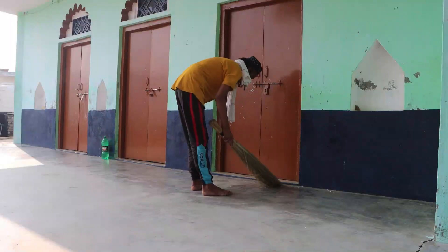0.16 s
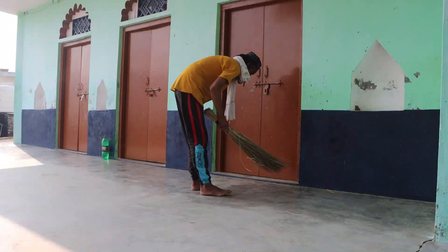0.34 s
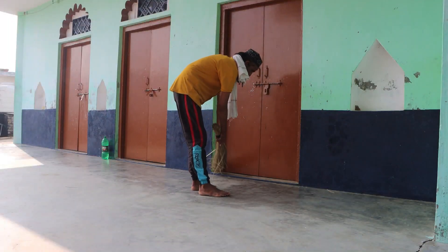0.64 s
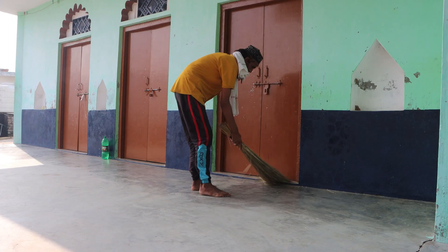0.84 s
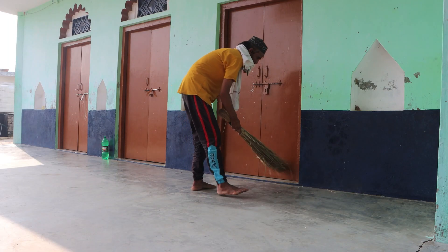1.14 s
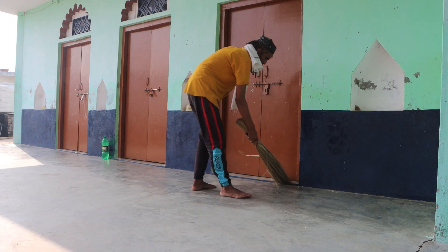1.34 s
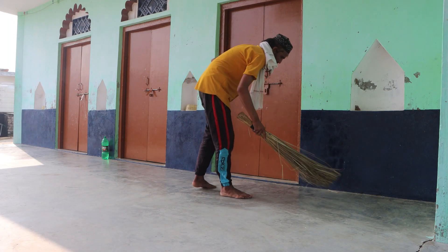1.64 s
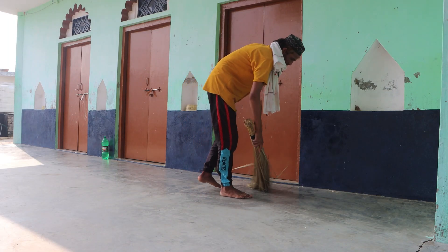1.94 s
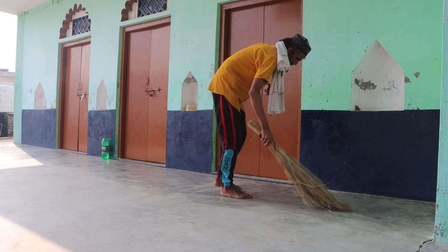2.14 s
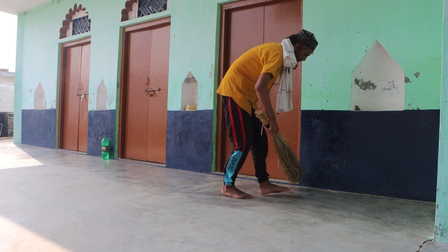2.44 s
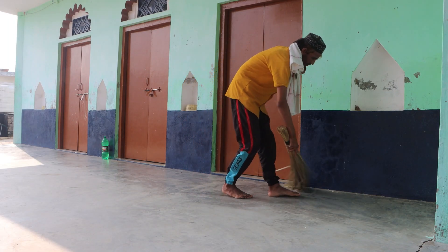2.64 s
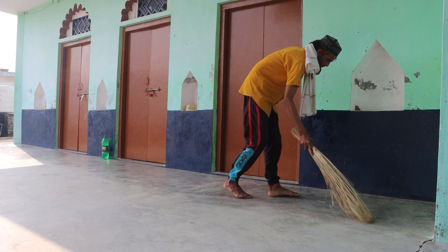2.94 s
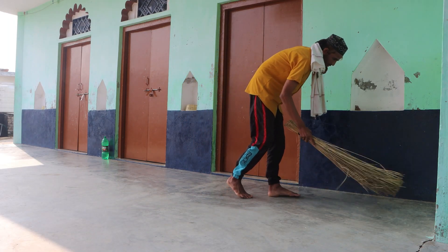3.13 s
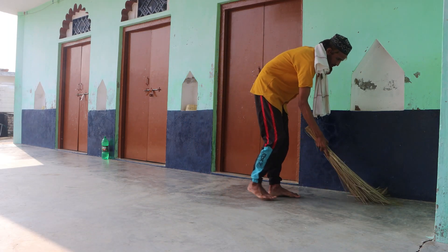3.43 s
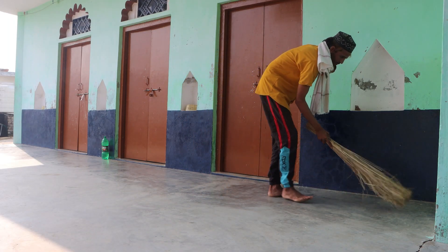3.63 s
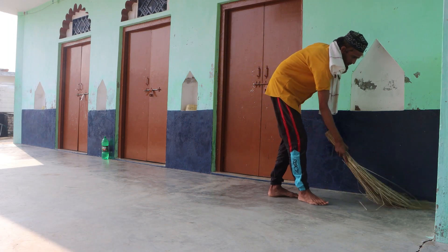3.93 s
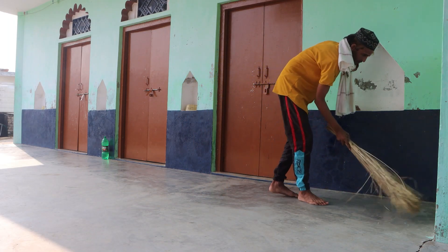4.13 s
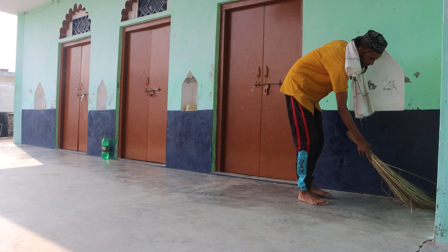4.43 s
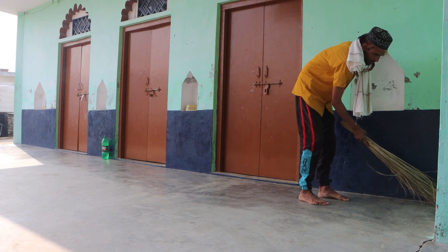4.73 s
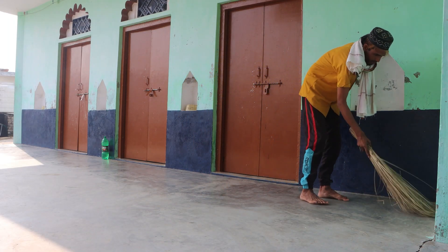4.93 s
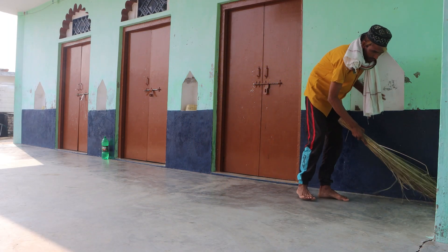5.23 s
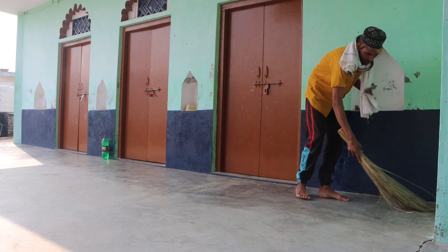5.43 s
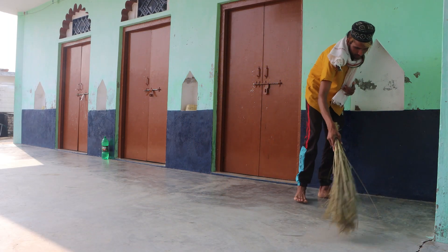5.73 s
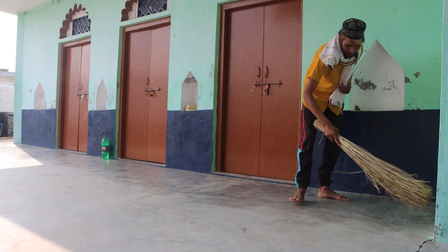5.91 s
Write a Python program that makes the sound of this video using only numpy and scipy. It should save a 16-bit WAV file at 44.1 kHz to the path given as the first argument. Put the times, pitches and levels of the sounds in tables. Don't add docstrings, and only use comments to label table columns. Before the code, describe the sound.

Low traffic rumble, a faint engine idle and airy hiss open the scene and stay behind everything. Almost at once a stiff straw broom begins swishing over concrete, about ten crisp strokes in six seconds, the first one followed by a longer, lighter gap. The strokes get louder and closer together midway, with sharp straw clicks and short rattles. Mono, a few metres off, with a short wall reflection.

```python
import sys
import numpy as np
from scipy import signal
from scipy.fft import rfft, irfft
from scipy.io import wavfile
from scipy.ndimage import uniform_filter1d, map_coordinates

SR = 44100
rng = np.random.default_rng(int(sys.argv[2]) if len(sys.argv) > 2 else 0)


def to_linear_factor(level_db):
    exponent = np.asarray(level_db, float) / 20
    return 10 ** exponent


def to_wav(sig):
    pcm = np.clip(np.atleast_2d(sig), -1, 1) * 32767
    pcm = np.round(pcm).astype(np.int16)
    wavfile.write(sys.argv[1], SR, pcm.T)


N = 267673
TIME_S = np.arange(N) / SR
SLOW_S = np.arange(0, N / SR, .001)


def unit(x):
    return x / np.sqrt(np.mean(x ** 2) + 1e-20)


def curves(rows):
    s, *columns = np.transpose(rows)
    return [np.interp(TIME_S, s, column) for column in columns]


def fine(slow):
    return np.interp(TIME_S, SLOW_S, slow)


def bell(s, half):
    return np.exp(-((SLOW_S - s) / half) ** 2)


def swell(s, half, db):
    return to_linear_factor(db) ** 2 * bell(s, half)


def wobble(rate):
    knots = rng.standard_normal(int(N * rate / SR) + 4)
    return map_coordinates(knots, [np.arange(N) * rate / SR])


def coloured(x, points):
    m = 2 ** 14
    f, db = np.transpose(points)
    hz = np.fft.rfftfreq(m, 1 / SR)
    shape_db = np.interp(np.log(hz + 1), np.log(f + 1), db, left=-70, right=-70)
    cepstrum = irfft(np.log(to_linear_factor(shape_db)), m)
    cepstrum[1:m // 2] *= 2
    cepstrum[m // 2 + 1:] = 0
    h = irfft(np.exp(rfft(cepstrum)), m)[:m // 2]
    return signal.oaconvolve(x, h / np.linalg.norm(h))[:N]


def slips(spread_db, clump_db):
    size_db = spread_db * np.minimum(rng.exponential(size=N), 4.5) + clump_db * wobble(500)
    return unit(rng.standard_normal(N) * to_linear_factor(size_db))


def burst(s, length, source):
    out, start, t = np.zeros(N), round(s * SR), np.arange(SR // 8) / SR
    out[start:start + len(t)] = np.exp(-(t / length) ** 3) * source[start:start + len(t)]
    return out


def levelled(piece, length, db):
    return to_linear_factor(db) * np.sqrt(length * SR) / np.linalg.norm(piece) * piece


# time in seconds, level in dB.
TRAFFIC_LEVEL = [(0, -32), (.39, -43), (.59, -31.5), (.9, -36), (1.2, -38), (1.4, -31), (1.57, -44.5),
                 (2.2, -38.5), (2.5, -35.5), (2.75, -34), (2.94, -43), (3.48, -31.5), (3.63, -47),
                 (4.36, -36), (5.21, -39), (5.34, -29.5), (5.66, -38), (6.07, -27.5)]
# peak in seconds, half length in seconds, boom in dB, drone in dB.
PASSES = [
    (.6, 0.18, -49.5, -58),
    (1.386, 0.091, -47, -41.5),
    (1.6, 0.082, -46, -52),
    (1.9, 0.21, -46, -42),
    (2.844, 0.17, -52, -52),
    (5.698, 0.25, -40.5, -52),
    (6.031, 0.12, -54, -46.5),
]
# frequency in Hz, density in dB per Hz.
RUMBLE_COLOUR = [(12, -39), (25, -5), (38, 0), (50, 1.5), (66, -6), (85, -17.5), (120, -30)]
BOOM_COLOUR = [(55, -38), (75, 0.5), (95, -8), (125, -3.5), (160, -14.5), (220, -24)]
DRONE_COLOUR = [(110, -40), (150, -8), (200, 3), (300, 1.5), (420, -1.5), (700, -4)]
AIR_COLOUR = [(150, 5.5), (250, -18.5), (583, -4), (931, -6), (1620, -5.5), (3900, -5.5), (5920, -8.5),
              (8520, -3), (13100, -6.5), (15600, -18)]


def street():
    rumble_db, = curves(TRAFFIC_LEVEL)
    swing_db = rumble_db - rumble_db.mean()

    def noise(colour):
        return coloured(rng.standard_normal(N), colour)

    def with_passes(db, column):
        passing = sum(swell(row[0], row[1], row[column]) for row in PASSES)
        return np.sqrt(to_linear_factor(db) ** 2 + fine(passing))

    hiss = to_linear_factor(-36 + wobble(36)) * noise(AIR_COLOUR)
    rumble = noise(RUMBLE_COLOUR)
    even, even_s = 0.99, 0.047
    loudness = uniform_filter1d(np.abs(rumble), int(even_s * SR)) + .1
    rumble = unit(rumble / loudness ** even)
    boom_db = -51 + 0.2 * swing_db + 0.95 * wobble(2.82)
    drone_db = -46.5 + 0.55 * swing_db - 1.6 * TIME_S + 0.66 * wobble(4.0)
    boom = with_passes(boom_db, column=2) * noise(BOOM_COLOUR)
    drone = with_passes(drone_db, column=3) * noise(DRONE_COLOUR)
    return to_linear_factor(rumble_db - 4.0) * rumble + boom + drone + hiss


# time in seconds, firing rate in Hz.
ENGINE_SPEED = [(0, 49.3), (.15, 50.9), (.25, 45.3), (.46, 45.7), (1.81, 48.04), (1.99, 45), (2.35, 47.9),
                (2.6, 43.85), (3.01, 47.9), (3.1, 44.3), (4.38, 44.46), (4.97, 44.3), (5.35, 47),
                (5.7, 47.8), (6.07, 47.55)]
ORDER_DB = [-41, -56.5, -56.5, -63]
# peak in seconds, half length in seconds, level in dB.
SURGES = [
    [(0, 0.044, -32), (1.6, 0.14, -38), (2.62, 0.058, -40.5), (4.9, 0.37, -37), (5.95, 0.14, -32)],
    [(.3, 0.24, -47.5), (1.99, 0.089, -43), (5.75, 0.11, -43)],
    [(.13, .04, -36), (4.97, 0.074, -46), (5.65, 0.31, -46.5), (6.07, 0.086, -43)],
    [(1.8, .3, -61), (2.6, 0.13, -50), (3.3, 0.24, -47.5), (4.0, 0.11, -43.5), (5.7, 0.26, -53)],
]


def engine():
    firing_hz, = curves(ENGINE_SPEED)
    turn = 2 * np.pi * np.cumsum(firing_hz) / SR
    out = np.zeros(N)
    for k, (idle_db, surges) in enumerate(zip(ORDER_DB, SURGES)):
        size = fine(np.sqrt(to_linear_factor(idle_db) ** 2 + sum(swell(*row) for row in surges)))
        level_db = -4.0 + 1.7 * wobble(4.5) + 1.3 * k * wobble(11)
        shake = 0.64 * wobble(1.85) + 0.27 * k * wobble(22)
        out += np.sqrt(2) * size * to_linear_factor(level_db) * np.sin(2 ** k * turn + shake)
    return out


def stroke(s, landing, length, land_db, lift_db):
    t = SLOW_S - s - landing
    along = np.clip(t / length, 0, 1)
    db = land_db + (lift_db - land_db) * along
    db += 9 * np.minimum(t, 0) / landing
    db -= 123 * np.maximum(t - length, 0)
    db += 500 * np.minimum(t + landing, 0)
    return to_linear_factor(db) ** 2, along - .5


def touch(power, thick_db, finest_db, stalk_db, ring_hz, weight):
    parts = np.broadcast_arrays(1, to_linear_factor(2 * thick_db), to_linear_factor(2 * finest_db), to_linear_factor(2 * stalk_db), ring_hz, weight)
    return power * np.array(parts).reshape(6, -1)


# touch-down in seconds, landing in seconds, sweep in seconds,
# level after landing in dB, level at lift-off in dB.
STROKES = [(.03, 0.04, 0.2, -20, -22.5), (.83, 0.073, 0.18, -21.5, -19.5), (1.42, 0.13, 0.1, -17, -20.5),
           (2.04, 0.085, 0.21, -17, -30), (2.715, 0.057, 0.42, -17.5, -24.5),
           (3.384, 0.02, 0.21, -13.5, -17), (3.928, 0.035, 0.091, -16.5, -18.5),
           (4.467, 0.014, 0.25, -16.5, -20), (4.915, 0.022, 0.21, -15, -20.5),
           (5.41, 0.032, 0.37, -21.5, -25), ]
# thick straws, finest tips and stalks in dB over the tips,
# tip ring in Hz, stalk weight from 0 to 1.
GRIPS = [(-2.5, -6, -10, 8360, 0.51), (-2.5, -8.5, -8.5, 7450, 0.55), (-8, -10, -9.5, 8440, 0.54),
         (-10, -11.5, -10, 9340, 0.34), (-11, -7.5, -9.5, 9000, 0.39), (-12.5, -10, -13.5, 7970, 0.56),
         (-10.5, -12, -8.5, 8800, 0.53), (-14, -9, -11.5, 8740, 0.5), (-12.5, -12.5, -11, 8260, 0.4),
         (-7.5, -6, -11, 8000, 0.52)]
ROLLS = [-5, 0.52, 5, 0.49, 1, -3, 1.7, -0.6, 0.95, -1]
# peak in seconds, half length in seconds, level in dB,
# stalks in dB over the tips, splay in dB by which thick and finest straws join.
DRAGS = [(0, 0.012, -29, -7, 4.5), (0.39, 0.12, -25, -7.5, -6.5), (0.547, 0.041, -37, -4, 3),
         (0.66, 0.053, -28.5, -7.5, 1.5), (0.802, 0.01, -36, 0.5, 11), (1.24, 0.083, -31.5, -5, -1),
         (1.357, 0.053, -27.5, -1.5, 7.5), (1.841, 0.2, -29.5, -6, -2.5), (1.987, 0.046, -24, -11.5, 0),
         (2.517, 0.073, -28.5, -4, 6), (2.62, 0.057, -24.5, -6.5, 2.5), (3.232, 0.049, -31, -9, 0),
         (3.337, 0.054, -26, -8, 0.5), (3.817, 0.071, -26.5, -10.5, 2), (4.162, 0.027, -22, -19, -5),
         (4.213, 0.041, -24.5, -7, 4.5), (4.308, 0.043, -36, -2.5, 9), (4.431, 0.049, -27, -11, 3),
         (4.888, 0.045, -26, -12.5, 1), (5.328, 0.043, -25, -12.5, -5), (5.373, 0.026, -26, -10, -3),
         (5.825, 0.02, -28.5, -11, -1), (5.91, 0.06, -32, -7.5, -2.5), (5.955, .012, -34, -12, 2),
         (6.014, 0.062, -32, -9, -4), (0.753, 0.028, -37, -13, 3), (2.46, .03, -37.5, -3.5, 10),
         (4.376, 0.019, -37, -4, 7), (3.715, 0.025, -29, -7, 4), (4.79, .015, -38, -4, 5)]
# peak in seconds, half length in seconds, level in dB,
# stalks in dB over the tips, finest tips in dB over the grip.
PUSHES = [(0.122, 0.049, -18, -12.5, 9.5), (.19, 0.035, -24, -21, 8), (0.267, 0.055, -20.5, -13, -4),
          (0.934, 0.056, -19, -16, 12), (1.055, 0.018, -31.5, 2.5, -10), (1.56, 0.035, -17, -16, -12.5),
          (1.671, 0.06, -30, -2, 15.5), (2.12, 0.039, -18.5, -21, -4), (2.2, 0.077, -22.5, -29, 16),
          (2.327, 0.057, -21, -4, 10.5), (2.866, 0.052, -14, -30, -13), (2.964, 0.047, -18, -15, 6),
          (3.099, 0.04, -24, -6, 5), (3.455, 0.048, -18, -9.5, -1), (3.617, 0.062, -20, -11, -4),
          (3.673, 0.029, -19.5, -20, 4), (3.757, 0.051, -22.5, -9, 1), (4.071, 0.039, -12.5, -19.5, 7),
          (4.498, 0.031, -25, -9, -6), (4.54, 0.022, -21.5, -6, -3), (4.578, 0.051, -19, -13.5, 10.5),
          (4.719, 0.033, -23.5, -8.5, 9), (5.054, 0.048, -16, -29, 11.5), (5.177, 0.045, -24.5, -4.5, 14),
          (5.451, 0.03, -26, -3.5, -9), (5.646, 0.062, -20, -35, 5.5), (5.6, .03, -27, -6, -8),
          (5.76, 0.032, -23.5, -7, 8), (2.816, 0.017, -22, -20, 0)]


def contact():
    total = np.full((6, len(SLOW_S)), 1e-12)
    for row, roll, (thick_db, finest_db, stalk_db, ring_hz, weight) in zip(STROKES, ROLLS, GRIPS):
        power, along = stroke(*row)
        total += touch(power, thick_db - 4.5 * along, finest_db - roll * along, stalk_db + 0.5 * along,
                       ring_hz + 397 * (1 + roll) / 2 * along, weight - 0.28 * along)
    landed_s = [row[0] + row[1] for row in STROKES]
    for s, half, db, stalk_db, splay_db in DRAGS:
        thick_db, finest_db, _, ring_hz, _ = [np.interp(s, landed_s, c) for c in np.transpose(GRIPS)]
        total += touch(swell(s, half, db), thick_db + 0.4 + splay_db, finest_db - 1 + splay_db,
                       stalk_db, ring_hz, weight=0.44)
    starts_s = [row[0] for row in STROKES]
    for s, half, db, stalk_db, fine_db in PUSHES:
        thick_db, finest_db, held_db, ring_hz, weight = GRIPS[np.searchsorted(starts_s, s) - 1]
        thick_db = thick_db + 2 + 0.62 * (stalk_db - held_db)
        ring_hz = ring_hz + 150 + 46 * fine_db
        total += touch(swell(s, half, db), thick_db, finest_db - 5 + fine_db, stalk_db, ring_hz, weight)
    share = total[1:] / total[0]
    tips_db, parts_db = 10 * np.log10(total[0]), 10 * np.log10(share[:3])
    return [fine(curve) for curve in (tips_db, *parts_db, *share[3:])]


# peak in seconds, half length in seconds, ring shift in kHz.
TILTS = [(.13, .02, 1.2), (.185, .02, -0.76), (.31, 0.036, .7), (1.07, .06, 1.1), (3.55, .13, 0.44),
         (1.78, 0.053, .9), (1.959, .05, -0.96), (2.82, .04, -.7), (3.269, 0.054, 1.1), (3.87, .025, -1.8),
         (3.985, 0.048, -.9), (4.1, .03, 0.66), (4.251, .04, 0.77), (4.38, .03, -.9), (4.6, .03, .55),
         (4.78, .03, 0.16), (4.9, .02, -1.1), (5.12, .06, .7), (5.249, .02, -0.29), (5.46, .04, -1.1),
         (5.78, 0.043, 0.91), (5.949, 0.031, 1.1)]


def tilt():
    return fine(sum(1000 * shift * bell(s, half) for s, half, shift in TILTS))


# peak in seconds, half length in seconds,
# rise of the sweep in dB, further rise of the finest tips in dB.
FLICKS = [(0.443, 0.0043, 5.5, 0), (0.471, 0.0033, 2, 0), (0.593, .005, 6, 0), (.76, .003, 6, 0),
          (1.169, .005, 2, -2), (1.297, .003, -1, 0), (1.407, 0.0041, 1.5, 2), (1.473, .004, 4.5, -2),
          (1.733, 0.0055, 1.5, 0), (1.765, .005, 2, 3), (1.825, .003, 3, 4), (1.843, .003, 3.5, 4),
          (1.912, 0.0081, 5, 2), (2.174, .005, 2, -2), (2.199, .005, 3.5, 2), (2.464, .005, 3, -7),
          (2.753, .003, 3, 0), (2.885, .005, 1, 3), (3.056, .004, 2.5, -0.5), (3.107, .004, 2, 4),
          (3.288, .004, 4, 2), (3.366, .003, 4, 0), (3.425, 0.0027, 1, -2), (3.461, 0.0032, 2, 0),
          (3.492, .004, 2, 0), (3.547, .002, 3, 0), (3.568, .003, 3, 0), (4.097, .003, -4, 2),
          (4.169, .004, 2, 7), (4.284, 0.0057, 6.5, 2), (4.371, 0.0044, 4.5, -2), (4.481, .005, 2, -3),
          (4.588, .006, 1.5, 5), (4.815, 0.0052, 4, 2), (4.835, 0.0037, 11, 0.5), (4.87, .003, 0, 0),
          (4.892, .003, 4, 0), (5.141, .003, 3, 0), (5.324, .003, 2.5, 0), (5.67, 0.0064, 2.5, 1),
          (1.537, .003, 1.5, 0), (1.579, .003, 3, 0), (5.822, 0.0048, 6, -2), (5.954, 0.0034, 2, 4),
          (6.055, .003, 4, 0)]


def flicks():
    bells = np.array([bell(s, half) for s, half, *_ in FLICKS])
    return [fine(db @ bells) for db in np.transpose(FLICKS)[2:]]


# frequency in Hz, density in dB per Hz.
TIPS_COLOUR = [(4400, -29), (5800, -8.5), (6800, -1.5), (7750, 5.5), (8700, 7), (9900, -1.5), (12100, -40)]
BENT_TIPS_COLOUR = [(5700, -62), (7300, -1.5), (8500, 6), (9550, 6.5), (10600, -2), (11600, -9),
                    (14000, -49)]
THICK_COLOUR = [(2800, -15.5), (3900, -9.5), (4800, -0.5), (6000, 3), (7000, 3.5), (8500, -3.5)]
FINEST_COLOUR = [(9000, -17), (10500, -7.5), (12400, -5), (14000, -11), (15000, -20), (15700, -27),
                 (17000, -58)]
STALKS_COLOUR = [(400, -40.5), (1000, -3), (1730, 5), (2400, 3.5), (3500, 4), (4500, 2.5), (6000, -21)]
BUNDLE_COLOUR = [(120, -5.5), (300, -5.5), (550, -1.5), (900, 0), (1730, 2.5), (2400, -2), (3500, -6.5),
                 (5000, -11)]


def sweep():
    tips_db, thick_db, finest_db, stalk_db, ring_hz, weight = contact()
    chatter_db = 0.34 * wobble(45) + 0.3 * wobble(80)
    surge_db, sheen_db = flicks()
    crowd = slips(spread_db=3.0, clump_db=1.2)

    def part(colour, own):
        return coloured(unit(crowd + own * slips(spread_db=2.0, clump_db=1.16)), colour)

    bend = np.pi / 2 * np.clip((ring_hz + tilt() - 6900) / 3600, 0, 1)
    tips = np.cos(bend) * part(TIPS_COLOUR, own=2.0) + np.sin(bend) * part(BENT_TIPS_COLOUR, own=1.0)
    tips *= to_linear_factor(-0.5 + 0.11 * wobble(45))
    thick = to_linear_factor(thick_db + 0.49 * wobble(33)) * part(THICK_COLOUR, own=0.99)
    finest = to_linear_factor(finest_db + sheen_db + 0.19 * wobble(27)) * part(FINEST_COLOUR, own=0.99)
    lean = np.pi / 2 * np.clip(weight, 0, 1)
    stalks = np.cos(lean) * part(STALKS_COLOUR, own=0.81) + np.sin(lean) * part(BUNDLE_COLOUR, own=0.86)
    stalks *= to_linear_factor(stalk_db + 0.52 + 0.49 * wobble(25))
    body = thick + stalks
    light = np.clip((-14 - tips_db) / 14, 0, 1)
    depth = .5 + .3 * (TIME_S < 1.4)
    body = body - depth * light * signal.lfilter(*signal.iirpeak(4100, 3, SR), body)
    return to_linear_factor(tips_db + chatter_db + surge_db + 0.29) * (tips + body + finest)


# time in seconds, peak in dB.
SNAPS = [(0.5247, -13), (0.6125, -11), (0.7093, -13), (0.7936, -11), (0.8515, -8), (1.1674, -15),
         (1.2614, -11), (1.4324, -8), (1.4734, -6), (1.8402, -12), (1.8724, -14), (1.9814, -11),
         (2.1734, 1), (2.1944, -4), (2.3894, -11), (2.6994, -14), (2.7477, -3), (2.9254, 0), (3.1944, -14),
         (3.2964, -13), (3.5663, -2), (3.5834, 0), (3.7534, -7), (3.8496, -6), (4.0964, 0), (4.4084, -15),
         (4.7227, -2), (5.1414, -3), (5.3184, -12), (5.8714, -16), (.0478, -7), (.8435, -13), (1.296, -14),
         (1.8208, -13), (2.0702, -8), (2.461, -15), (2.826, -2), (2.881, -4), (4.052, -2), (5.022, -4),
         (4.245, -14), (3.3942, -5), (3.93, -13), (3.9474, -7), (4.3291, -20), (4.368, -16), (4.4782, -6),
         (4.8271, -11), (4.8345, -8), (4.9262, -6), (5.4216, -9), (6.0526, -19)]
# start in seconds, length in seconds, rms in dB, stalk share in dB.
RATTLES = [(.422, .006, -26, -14), (.437, .012, -25, -14), (.709, .011, -26, -15), (.7942, .009, -27, -18),
           (.807, .005, -27, -18), (4.8275, .008, -23, -14), (3.848, .01, -25, -9), (4.582, .014, -16, -19),
           (1.026, .02, -17, -14), (1.549, .01, -13, -12), (2.922, .01, -16, -19), (4.722, .008, -20, -14),
           (5.664, .016, -21, -20), (2.285, .012, -22, -6), (3.41, .02, -20, -10), (3.755, .012, -24, -8),
           (2.805, .02, -17, -12)]
# frequency in Hz, density in dB per Hz.
SNAP_COLOUR = [(4500, -28), (6200, -10), (7500, 0), (8600, 6), (9600, 2), (10800, -8), (12800, -40)]


def straw_ring(x):
    return (2 * coloured(x, SNAP_COLOUR) + to_linear_factor(-8) * coloured(x, FINEST_COLOUR)
            + to_linear_factor(-12) * coloured(x, THICK_COLOUR))


def snaps():
    one_snap = straw_ring(np.ones(1))
    high, low = np.zeros(N), np.zeros(N)
    for s, db in SNAPS:
        at = round((s + .0007) * SR)
        high[at] = to_linear_factor(db - 2) / np.abs(one_snap).max()
        low[at] = to_linear_factor(-11.5 + 0.17 * db)
    volley = slips(spread_db=2.5, clump_db=2.2)
    for s, length, db, share_db in RATTLES:
        piece = levelled(burst(s, length, volley), length, db)
        high += piece / np.linalg.norm(one_snap)
        low += to_linear_factor(share_db) * piece
    return straw_ring(high) + coloured(low, STALKS_COLOUR)


def wall(x):
    t = np.arange(SR // 4) / SR
    tail = rng.standard_normal(len(t)) * to_linear_factor(-60 * t / 0.22) * (t > .002)
    return signal.fftconvolve(x, tail / np.linalg.norm(tail))[:N]


# start in seconds, length in seconds, rms in dB,
# frequency in Hz, bandwidth in Hz.
GRIT = [(1.3418, .004, -16, 5170, 120), (1.3436, .004, -19, 4350, 180), (1.342, .006, -25, 3800, 200),
        (1.347, .0025, -24, 5400, 300), (4.475, .003, -22, 1900, 1200), (4.492, .006, -19, 1750, 150),
        (4.51, .004, -25, 3300, 600), (4.506, .003, -26, 1700, 300), (2.123, .002, -8, 8600, 900),
        (3.393, .012, -31, 550, 250), (3.415, .007, -28, 1570, 200), (3.415, .006, -30, 1100, 200),
        (3.468, .01, -26, 1550, 300), (3.955, .03, -34, 520, 300), (4.478, .09, -33, 1200, 900),
        (1.752, .025, -35, 330, 90), (1.9, .04, -41, 280, 90), (.46, .04, -44, 310, 60),
        (1.195, .002, -29, 1100, 900)]


def grit():
    out, noise = np.zeros(N), rng.standard_normal(N)
    for s, length, db, hz, width_hz in GRIT:
        b, a = signal.iirpeak(hz, hz / width_hz, SR)
        ring = signal.lfilter(b, a, signal.lfilter(b, a, noise))
        out += levelled(burst(s, length, ring), length, db)
    return out


# time in seconds, peak in dB, frequency in Hz, length in seconds.
FOOTFALL = [
    (2.775, -24, 40.5, 0.03),
    (2.752, -28, 75, 0.013),
]


def footfall():
    out = np.zeros(N)
    for s, db, hz, length in FOOTFALL:
        t = TIME_S - s
        out += to_linear_factor(db) * np.exp(-(t / length) ** 2) * np.cos(2 * np.pi * hz * t)
    return out


def scene():
    background = street() + engine()
    broom = sweep()
    clicks = snaps() + grit()
    mono = background + broom + clicks + to_linear_factor(-19) * wall(clicks) + footfall()
    return np.array([mono, mono])


def low_pass(x):
    return signal.sosfilt(signal.butter(12, 15750, fs=SR, output="sos"), x)


def record(dry):
    noisy = dry + to_linear_factor(-52.5) * rng.standard_normal(N)
    limited = noisy / (1 + np.abs(noisy / .98) ** 6) ** (1 / 6)
    return low_pass(limited)


dry = scene()
out = record(dry)
to_wav(out)
```